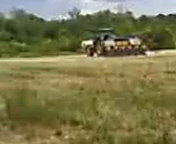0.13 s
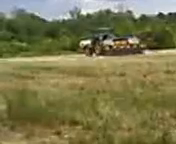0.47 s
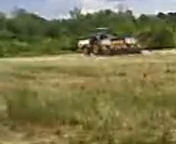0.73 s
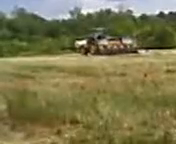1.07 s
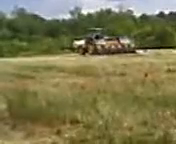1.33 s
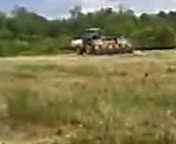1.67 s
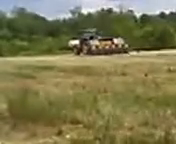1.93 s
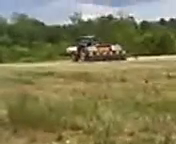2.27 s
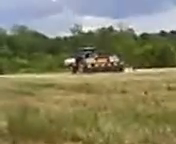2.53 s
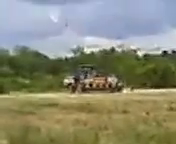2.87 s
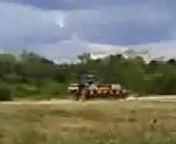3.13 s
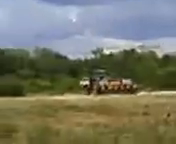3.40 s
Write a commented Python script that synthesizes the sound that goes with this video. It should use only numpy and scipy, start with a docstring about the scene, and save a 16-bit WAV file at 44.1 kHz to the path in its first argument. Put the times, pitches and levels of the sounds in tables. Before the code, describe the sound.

A distant diesel tractor chugs and rattles steadily across a field after a sharp opening click.

```python
"""Distant diesel tractor

After a short silence a sharp click cuts in a three-cylinder tractor at a steady 1000 rpm, far off across a grassy field.
Exhaust puffs are summed harmonics; the body drones in a cyclic pattern; knocks ring block, frame and cover.
Filtered noise makes the rush and the light wind bumps on the microphone.
Late on come soft thumps, one heavier clank, and a scrape ending in a tick."""
import sys
import numpy as np
from scipy import signal
from scipy.fft import rfft, irfft
from scipy.io import wavfile
from scipy.ndimage import uniform_filter1d

SR = 44100
rng = np.random.default_rng(int(sys.argv[2]) if len(sys.argv) > 2 else 0)


def to_wav(sig):
    """Store sig (one row per channel, or 1-D mono) as 16-bit WAV at the path in sys.argv[1].

    Samples outside -1..1 are clipped; the rate is SR.
    """
    pcm = np.clip(np.atleast_2d(sig), -1, 1) * 32767
    pcm = np.round(pcm).astype(np.int16)
    wavfile.write(sys.argv[1], SR, pcm.T)  # frames by channels


N = 157878
TIME = np.arange(N) / SR

CYCLE_HZ, CYLINDERS = 8.317, 3  # engine cycles per second, two crank turns each
WANDER_HZ = 1.16  # how quickly the crank timing drifts early and late
CLICK_S = 0.1328  # the click, and the start of the fade-in behind it
# Harmonics of the exhaust puff: firing_multiple, relative_level_db
EXHAUST_HARMONICS = [(1, -9.5), (2, -7.5), (3, -11.5), (4, -3), (5, -5.5), (6, -1.5), (7, -17), (8, -9.5),
                     (9, -15.5), (10, -10), (11, -8.5), (12, -12), (14, -9.5), (17, -9.5)]


def from_db(db):
    """Decibels to amplitude gain."""
    return 10 ** (np.asarray(db) / 20)


def rms_one(x):
    """Scale to unit rms."""
    return x / np.sqrt(np.mean(x ** 2) + 1e-20)


def at_hz(points, hz):
    """Read a spectrum table on a log-frequency axis."""
    f, db = np.transpose(points)
    return np.interp(np.log(np.maximum(hz, 1)), np.log(f), db)


def over_time(points):
    """Draw a (start_s, level_db) table as a curve over the whole sound."""
    s, db = np.transpose(points)
    return np.interp(TIME, s, db)


def drift(rate_hz):
    """Smooth random drift with spread 1: twice low-passed noise, drawn at every 40th sample."""
    step = 40
    r = np.exp(-2 * np.pi * rate_hz * step / SR)
    noise = rng.standard_normal(N // step + 2002)
    slow = signal.lfilter([1], [1, -2 * r, r * r], noise)[2000:]  # skip the filter's settling
    return np.interp(np.arange(N) / step, np.arange(len(slow)), rms_one(slow))


def colour(x, spectrum):
    """Shape a signal's spectrum; rms 1."""
    gain = from_db(at_hz(spectrum, np.arange(N // 2 + 1) * SR / N))
    return rms_one(irfft(rfft(x) * gain, N))


def resonate(x, modes):
    """Parallel two-pole resonances with alternating signs; a wider mode dies sooner."""
    out = 0
    for k, (hz, width_hz, db) in enumerate(modes):
        r = np.exp(-np.pi * width_hz / SR)
        poles = [1, -2 * r * np.cos(2 * np.pi * hz / SR), r * r]
        ring = (1 - r * r) / 2 * signal.lfilter([1, 0, -1], poles, x + 1e-18)
        out = out + (-1) ** k * from_db(db) * ring
    return out


def low_pass(x, hz, order):
    """Butterworth low-pass."""
    return signal.sosfilt(signal.butter(order, min(hz, SR / 2 - 100), fs=SR, output="sos"), x)


def burst(s, decay_s):
    """Noise that starts at once and dies away exponentially."""
    return rng.standard_normal(N) * (TIME > s) * np.exp(-abs(TIME - s) / decay_s)


def click(count=4):
    """A quick run of growing spikes, a short faint noise tail behind them, through broad resonances."""
    # What the click rings with: pitch_hz, width_hz, level_db
    click_ring = [(503, 1800, 0.5), (3400, 3900, -11.5), (7400, 1800, -6), (6030, 838, -0.5)]
    spike_gap_s, spike_growth_db = 0.00027, 3.5
    tail_length_s = 0.028
    snap = from_db(-32) * burst(CLICK_S, decay_s=0.013) * (TIME < CLICK_S + tail_length_s)
    for k in range(count):
        at = int(CLICK_S * SR) + round(k * spike_gap_s * SR)
        snap[at] += from_db(spike_growth_db * (k - count / 2))
    return from_db(11) * low_pass(resonate(snap, click_ring), hz=9340, order=8)


def exhaust(crank_s):
    """A suck-and-push puff per firing: harmonics in step, the upper ones smeared in time by the pipe."""
    # Strength of each cylinder's puff: level_db
    cylinder_levels = [0.96, 0, 0.5]
    level_db, rough_db, scatter_db = -36, 0.8, 1
    puff_delay_s, jitter_s = 0.0203, 0.0003
    pipe_smear_s, smear_above_hz = 0.0022, 190
    puff_s = crank_s - puff_delay_s + jitter_s * drift(14.9)
    out = 0
    for multiple, db in EXHAUST_HARMONICS:
        hz = round(multiple) * CYLINDERS * CYCLE_HZ
        smear_s = pipe_smear_s * rng.normal() * (hz > smear_above_hz)
        strength = from_db(db + rough_db * drift(4.1))
        out = out + strength * np.sin(2 * np.pi * hz * (puff_s - smear_s))
    firing = puff_s * CYCLE_HZ * CYLINDERS
    cylinder_db = np.interp(firing, np.arange(CYLINDERS), cylinder_levels, period=CYLINDERS)
    return np.sqrt(2) * from_db(level_db + cylinder_db + scatter_db * drift(15)) * out


def drone(crank_s, count=170, size=8192):
    """The body shakes in one pattern every cycle: close lines between the exhaust's, throbbing."""
    # Spectrum of the shaking body: pitch_hz, relative_level_db per line
    body_spectrum = [(130, -32.5), (165, -4), (210, -2.5), (300, -5.5), (365, -7.5), (450, -10.5),
                     (580, -15), (720, -11.5), (820, -22.5), (1200, -19), (1450, -38)]
    # Panels that each hum on one line: cycle_multiple, extra_level_db
    humming_panels = [(20, 5), (37, 7.5), (44, 10), (50, 8.5), (62, 9.5), (70, 5), (77, 2), (83, -1),
                      (86, 8)]
    level_db, rough_db = -49.5, 1.44
    throb_swing_db, throb_peak_s = 3, 0.045  # once a cycle
    chug_swing_db, chug_peak_s = 2, 0.012  # once a firing
    hz = np.arange(count) * CYCLE_HZ
    phases = np.exp(2j * np.pi * rng.random(count))
    lines = from_db(at_hz(body_spectrum, hz)) * phases * (hz > CYCLE_HZ)
    for multiple, db in humming_panels:
        lines[round(multiple)] *= from_db(db)
    lines[[round(multiple) * CYLINDERS for multiple, _ in EXHAUST_HARMONICS]] = 0
    pattern = irfft(lines, size) * size / np.sqrt(2)
    throb_db = throb_swing_db * np.cos(2 * np.pi * CYCLE_HZ * (crank_s - throb_peak_s))
    chug_db = chug_swing_db * np.cos(2 * np.pi * CYCLE_HZ * CYLINDERS * (crank_s - chug_peak_s))
    strength = from_db(level_db + throb_db + chug_db + rough_db * drift(17))
    return strength * np.interp(crank_s * CYCLE_HZ % 1, np.arange(size) / size, pattern)


def rattles(crank_s, count=32):
    """Each knock swells and dies; returns its strength on the block, on the cover and as bare rasp."""
    # Knocks in one cycle: start_s, decay_s, block_level_db, cover_level_db, rasp_level_db (all relative)
    knock_round = [(.001, 0.0086, 5.5, -3.5, -0.5), (.015, 0.0091, -7.5, -9.5, 1.5),
                   (.035, .0083, -4.5, -3.5, 1.5), (.043, 0.0094, -2, 1, 1), (0.054, 0.0023, -14, -0.5, 0),
                   (0.074, .008, -5, -8, 0), (.086, .010, -7, -0.5, -1.5),
                   (0.099, 0.0055, -16.5, -1.5, -0.5), (0.114, .005, -2.5, 0, -2)]
    attack_s, jitter_s, scatter_db = 0.0033, 0.00046, 1.5
    power = np.zeros((3, N))
    for cycle in range(-1, count - 1):
        for s, decay_s, *levels_db in knock_round:
            start = cycle / CYCLE_HZ + s + jitter_s * rng.normal()
            gains = from_db(np.array(levels_db) + scatter_db * rng.normal())
            a, b = np.searchsorted(crank_s, [start, start + 1 / CYCLE_HZ])
            age = crank_s[a:b] - start
            swell = np.minimum(age / attack_s, 1)
            decay = np.exp(-np.maximum(age - attack_s, 0) / decay_s)
            power[:, a:b] += (gains[:, None] * swell * decay) ** 2
    return np.sqrt(power)


def blows(crank_s, count=32):
    """Hard metal blows, single-sample, near set crank angles; returns force on block and frame."""
    # Blows within one cycle: start_s, block_level_db, frame_level_db
    blow_round = [(.0032, 4.5, 1), (.0078, -2, 1.5), (.0362, -9.5, 1.5), (.0468, -1.5, 5),
                  (.0785, -6.5, -5)]
    jitter_s, wander_s, scatter_db = 0.00008, 0.0003, 1
    force = np.zeros((2, N))
    for s, *levels_db in blow_round:
        starts = np.arange(-1, count - 1) / CYCLE_HZ + s + jitter_s * rng.standard_normal(count)
        for at in np.searchsorted(crank_s + wander_s * drift(WANDER_HZ), starts):
            gains = from_db(np.array(levels_db) + scatter_db * rng.normal())
            force[:, at:at + 1] += gains[:, None]
    return force


def shaken(strength, modes):
    """A part rattled into its modes: an even noise ring that follows the knocks and rings on; rms 1."""
    even_s, ring_out_s = 0.012, 0.0025
    ring = resonate(rng.standard_normal(N), modes)
    ring = ring / np.sqrt(uniform_filter1d(ring ** 2, int(even_s * SR) + 1) + 1e-12)
    keep = np.exp(-1 / (ring_out_s * SR))
    return rms_one(ring * signal.lfilter([1 - keep], [1, -keep], strength))


def whine():
    """The cover's sustained note: a sine wavering in pitch and strength."""
    pitch_hz = 1696 + 10 * drift(14)
    level_db = -46.5 + 2.5 * drift(17)
    return np.sqrt(2) * from_db(level_db) * np.sin(2 * np.pi * np.cumsum(pitch_hz) / SR)


def knocks(crank_s):
    """Blows and rattles ring the block, the frame and the cover; the rattles also rasp as bare noise."""
    # Resonances of block, cover and frame: pitch_hz, width_hz, relative_level_db
    block_modes = [(2200, 88, 2.5), (2462, 57, 1.5), (2670, 94, -7), (2064, 46, -9.5), (3050, 230, -16)]
    cover_modes = [(1707, 27, 2.5), (1600, 120, -17.5), (1797, 53, -8)]
    frame_modes = [(569, 60, -3.5), (699, 64, -2), (940, 220, -7), (1239, 200, -12)]
    # Hardness of the knocks on the block: start_s, level_db
    hardness = [(.2, -1), (.9, -2.5), (1.5, 0), (2.1, 0), (2.9, 2.5), (3.55, 0.5)]
    # Favour for the block's upper rings against its lower ones: start_s, level_db (added above, taken below)
    ring_tilt = [(.2, 1), (1.4, 0.5), (2.1, 2), (2.8, 0.5), (3.25, -3), (3.55, -.5)]
    # How strongly the cover sings: start_s, level_db
    cover_level = [(.2, -1), (.9, -1.5), (1.05, 2), (1.5, 2.5), (1.9, 0), (2.6, -2.5), (3.2, -1.5),
                   (3.55, 2)]
    # Noise spectrum of the rasp: pitch_hz, relative_level_db per Hz
    rasp_spectrum = [(150, -12), (300, 3.5), (700, 3.5), (880, -2), (1350, -6.5), (1550, 2), (2000, -4),
                     (2600, -5.5), (3100, -8.5), (3550, -18), (4200, -29), (4900, -34.5)]
    split_hz, grit_db = 2340, 1.0
    on_block, on_cover, bare = rattles(crank_s)
    block_blows, frame_blows = blows(crank_s)
    tilt_db = over_time(ring_tilt)
    tilted = [(hz, width_hz, db + tilt_db * np.sign(hz - split_hz)) for hz, width_hz, db in block_modes]
    block = resonate(block_blows, tilted) + from_db(-38.5) * shaken(on_block, tilted)
    block = from_db(over_time(hardness)) * block
    cover = from_db(-42) * shaken(on_cover, cover_modes) + whine()
    cover = from_db(over_time(cover_level)) * cover
    frame = resonate(frame_blows, frame_modes)
    grit = rng.standard_normal(N) * from_db(grit_db * drift(250))
    rasp = from_db(-38) * colour(bare * grit, rasp_spectrum)
    return low_pass(block + cover + frame, hz=3040, order=6) + rasp


def rush():
    """Gears, fan and field as one steady coloured noise."""
    # Noise spectrum of the rush: pitch_hz, relative_level_db per Hz
    rush_spectrum = [(20, -10), (45, -0.5), (85, -0.5), (170, -0.5), (300, -12.5), (600, -4.5),
                     (900, -12.5), (1400, -12), (3000, -12.5), (3600, -29.5), (4900, -49.5)]
    return from_db(-38) * colour(rng.standard_normal(N), rush_spectrum)


def through_air(x):
    """Moving air over the field makes the treble swell and fade at random."""
    low = signal.sosfiltfilt(signal.butter(4, 2700, fs=SR, output="sos"), x)
    return low + (x - low) * from_db(1.5 * drift(15))


def wind():
    """Short low bumps of air on the microphone: band-passed noise in bell-shaped swells."""
    # Wind bumps: peak_s, width_s, level_db, centre_hz
    gusts = [(1.989, 0.048, -33, 86.6), (2.589, 0.027, -35, 108.7), (2.666, 0.013, -27.5, 262),
             (2.688, 0.022, -25.5, 131), (3.31, 0.061, -35, 45.6), (3.411, 0.027, -34, 75.2)]
    out = 0
    for s, width_s, db, hz in gusts:
        band = signal.butter(2, [hz / 1.14, hz * 1.46], "band", fs=SR, output="sos")
        air = signal.sosfilt(band, rng.standard_normal(N))
        swell = np.exp(-((TIME - s) / width_s) ** 2 / 2)
        loudness = np.sqrt(np.average(air ** 2, weights=swell ** 2))
        out = out + from_db(db) * swell * air / loudness
    return out


def thumps():
    """A quick run of soft bumps makes the microphone boom: impulses into low resonances."""
    # Bumps: start_s, level_db
    bumps = [(2.5695, 20), (2.6555, 17), (2.6700, 27), (2.6865, 25.5), (2.7010, 18)]
    # What a bump booms with: pitch_hz, width_hz, level_db
    boom = [(128, 45, 0), (235, 90, -4), (380, 70, -12)]
    push = np.zeros(N)
    for s, db in bumps:
        push[int(s * SR)] += from_db(db)
    return low_pass(resonate(push, boom), hz=450, order=4)


def clank():
    """One heavier metal knock: a noise burst rings two resonances."""
    # What the clank rings with: pitch_hz, width_hz, level_db
    clank_ring = [(1700, 70, 4.5), (2300, 200, -2)]
    hit = burst(2.649, decay_s=0.003)
    return from_db(-5.5) * low_pass(resonate(hit, clank_ring), hz=3000, order=6)


def tick():
    """A loose part scrapes briefly, a swell of coloured noise, and ends in a dry noise tick."""
    # Noise spectrum of the scrape: pitch_hz, relative_level_db per Hz
    scrape_spectrum = [(300, -4), (1300, 5.5), (3000, -4.5), (4000, -12.5), (4800, -36.5)]
    scrape_s, width_s = 3.33, 0.009
    swell = np.exp(-((TIME - scrape_s) / width_s) ** 2 / 2)
    scrape = from_db(-32.5) * swell * colour(rng.standard_normal(N), scrape_spectrum)
    return scrape + from_db(-19) * low_pass(burst(3.336, decay_s=0.00067), hz=3450, order=4)


def scene():
    """Tractor, rush and wind, dulled in the treble, rise quickly behind the opening click."""
    cycle_start_s, wander_s, fade_in_s = 0.196, 0.00036, 0.01514
    # engine time, running slightly early or late; a cycle begins at its zero
    crank_s = TIME - cycle_start_s + wander_s * drift(WANDER_HZ)
    distant = through_air(exhaust(crank_s) + drone(crank_s) + knocks(crank_s) + rush())
    field = distant + wind() + thumps() + clank() + tick()
    fade = np.sqrt(np.clip((TIME - CLICK_S) / fade_in_s, 0, 1))
    return (low_pass(field * fade, hz=4890, order=24) + click())[None]


def record(dry):
    """Overload flattens peaks beyond the limit; a steep low-pass then cuts the top."""
    top_cut = signal.cheby2(12, 70, 13700, fs=SR, output="sos")  # 70 dB down from 13.7 kHz up
    return signal.sosfilt(top_cut, np.clip(dry, -0.84, 0.84))


dry = scene()
out = record(dry)
to_wav(out)
```